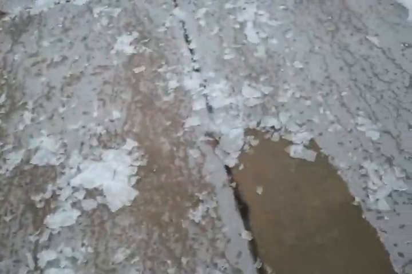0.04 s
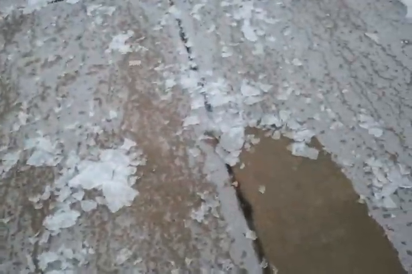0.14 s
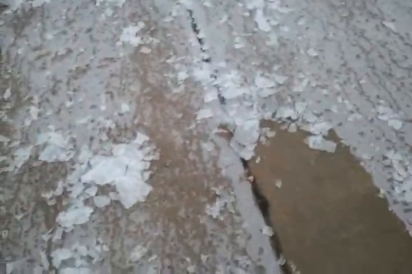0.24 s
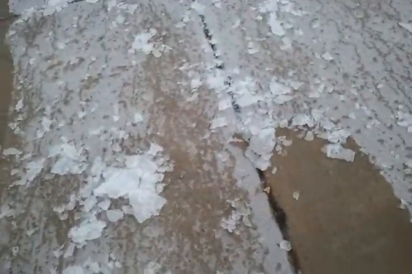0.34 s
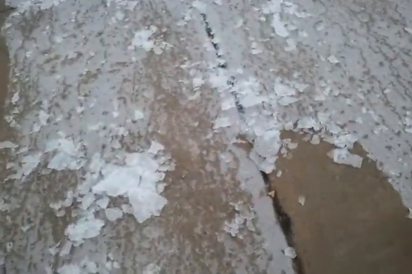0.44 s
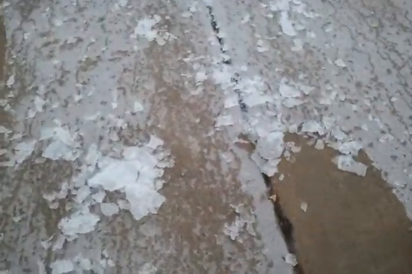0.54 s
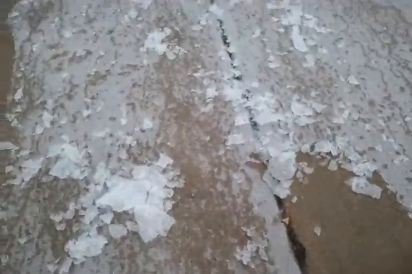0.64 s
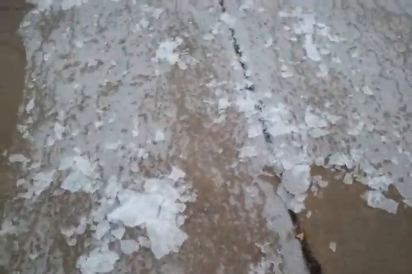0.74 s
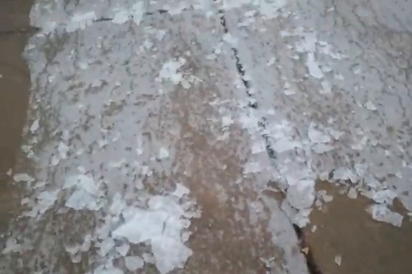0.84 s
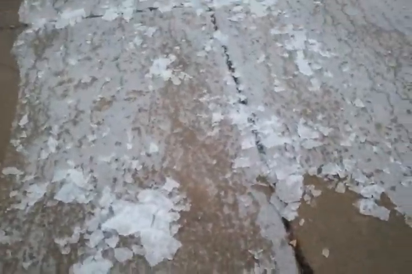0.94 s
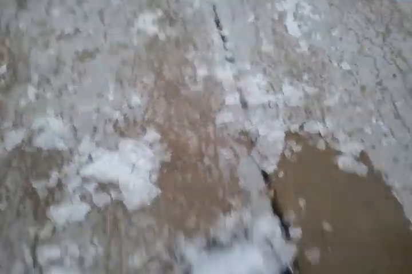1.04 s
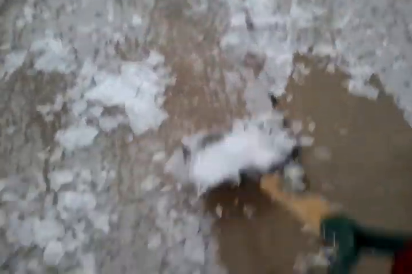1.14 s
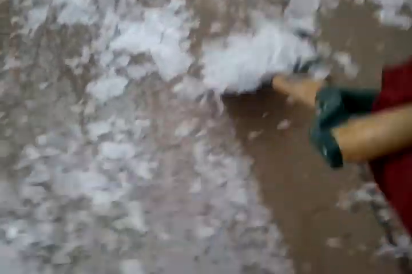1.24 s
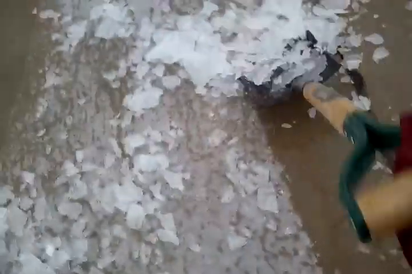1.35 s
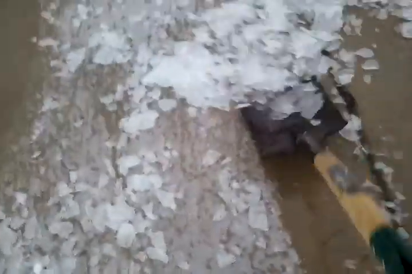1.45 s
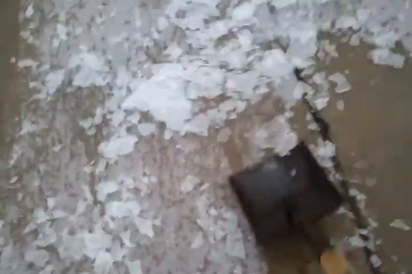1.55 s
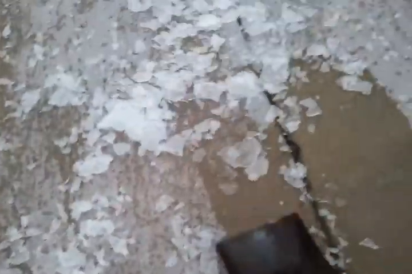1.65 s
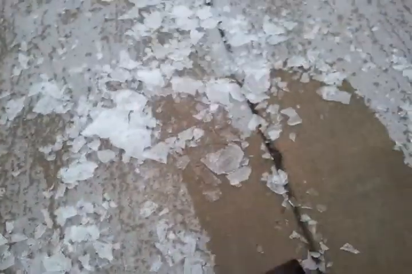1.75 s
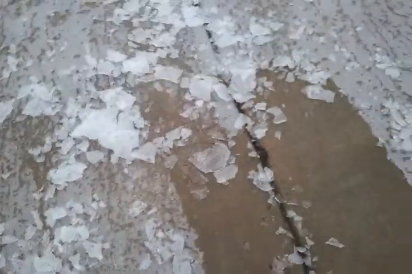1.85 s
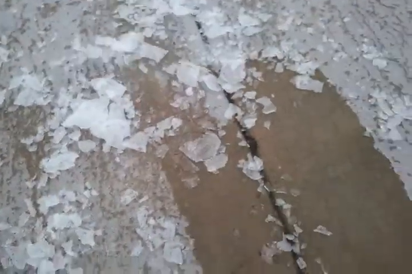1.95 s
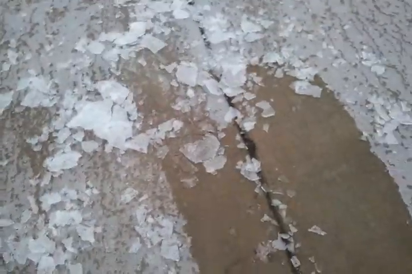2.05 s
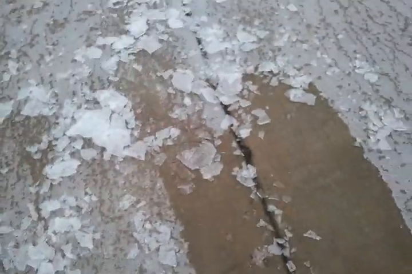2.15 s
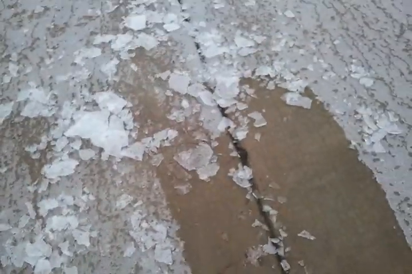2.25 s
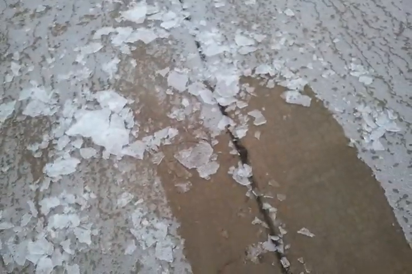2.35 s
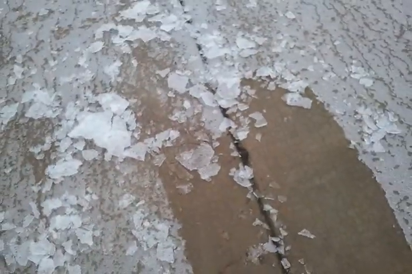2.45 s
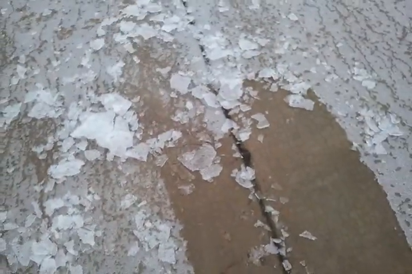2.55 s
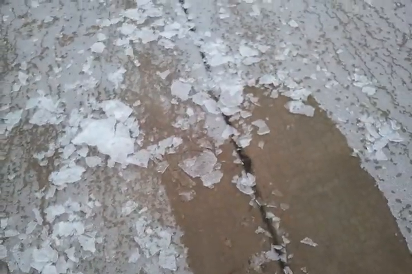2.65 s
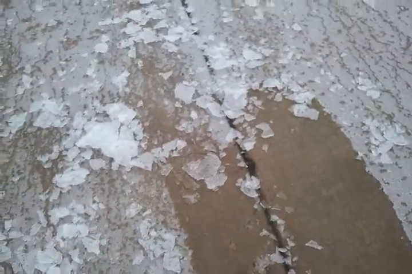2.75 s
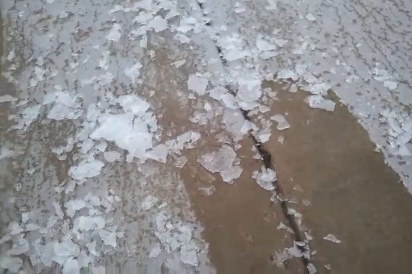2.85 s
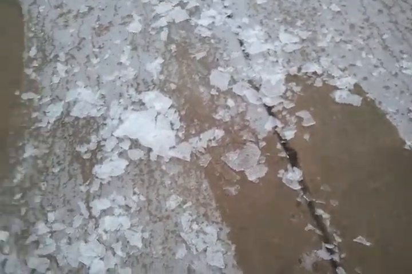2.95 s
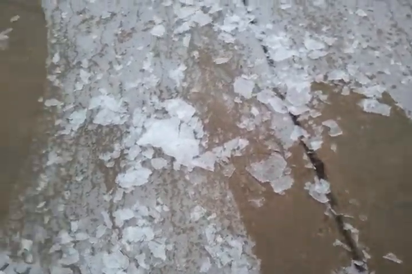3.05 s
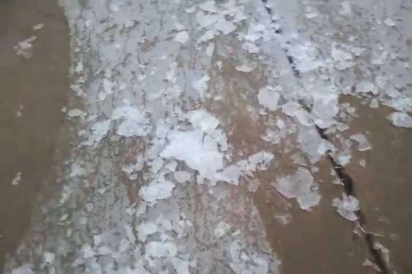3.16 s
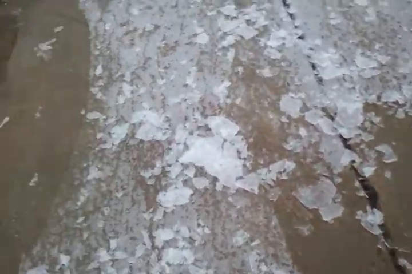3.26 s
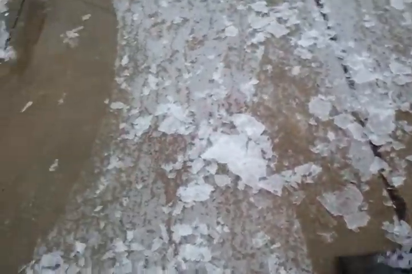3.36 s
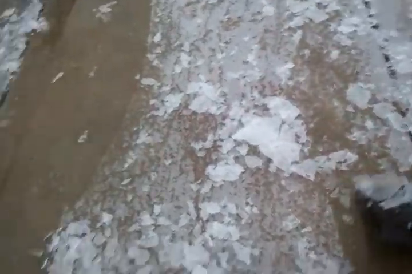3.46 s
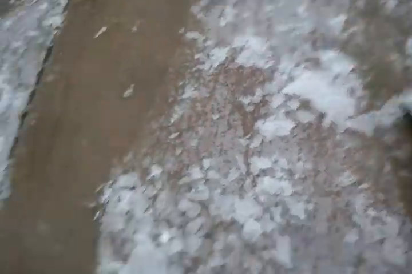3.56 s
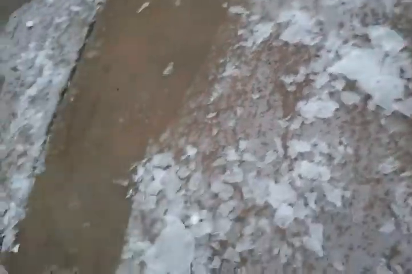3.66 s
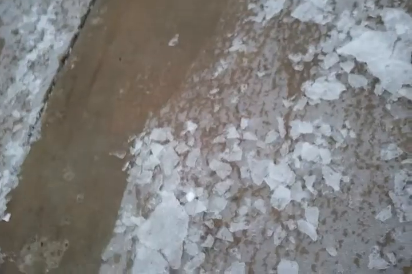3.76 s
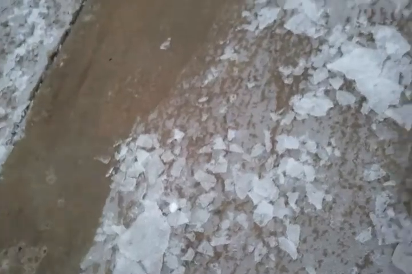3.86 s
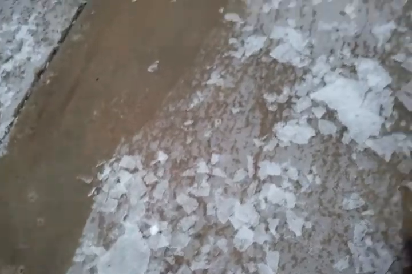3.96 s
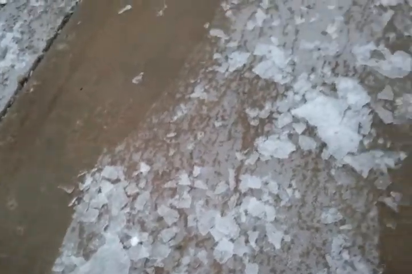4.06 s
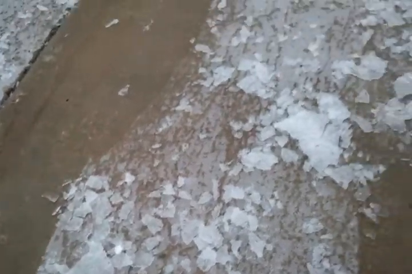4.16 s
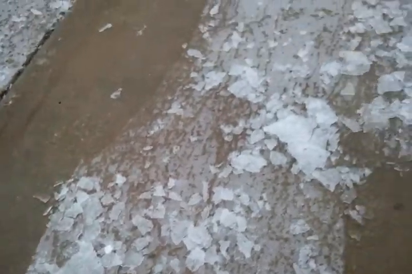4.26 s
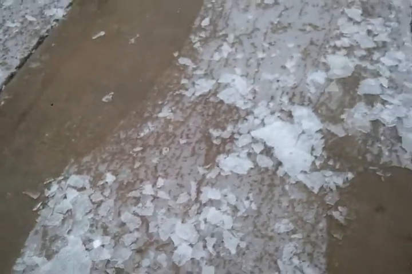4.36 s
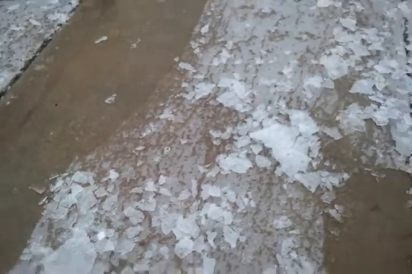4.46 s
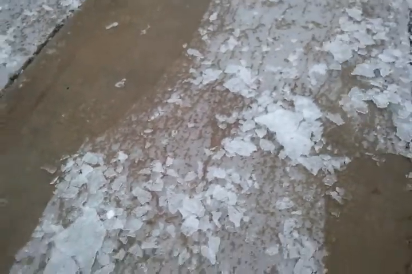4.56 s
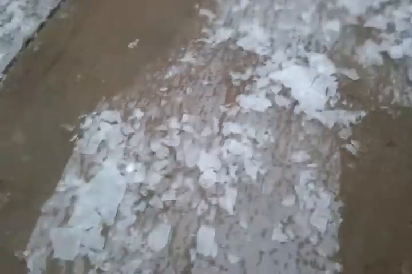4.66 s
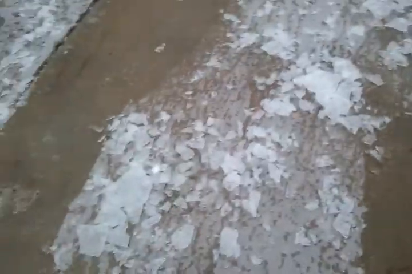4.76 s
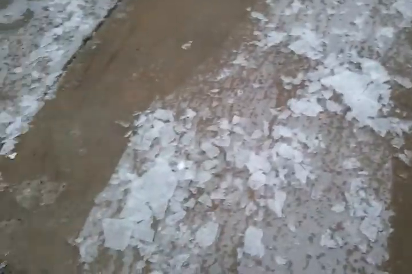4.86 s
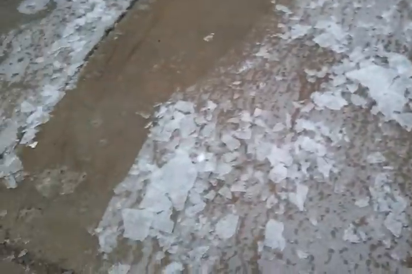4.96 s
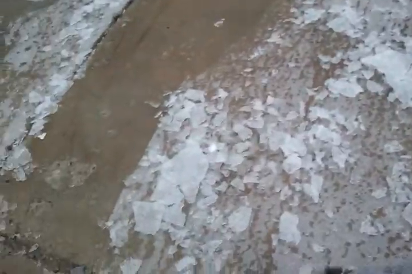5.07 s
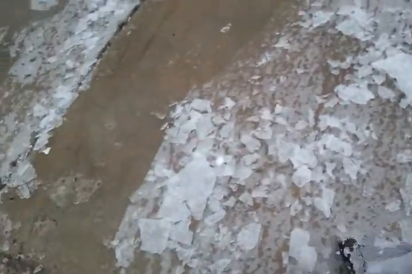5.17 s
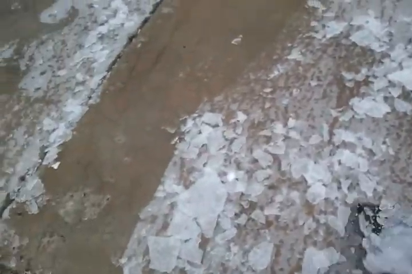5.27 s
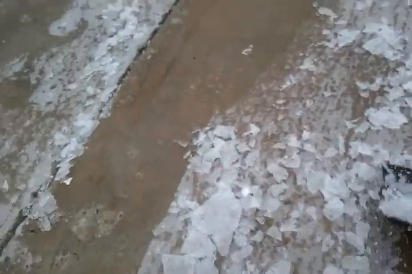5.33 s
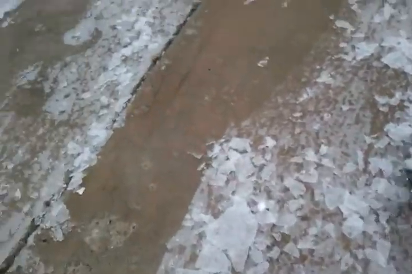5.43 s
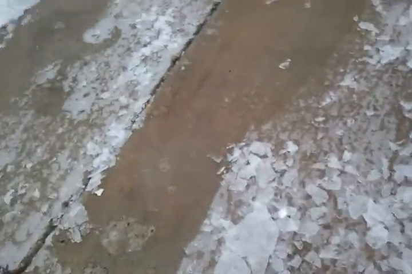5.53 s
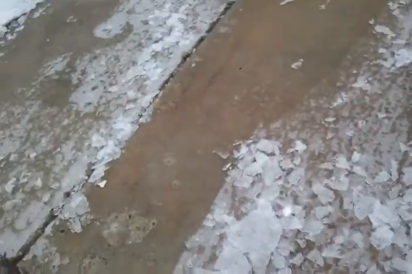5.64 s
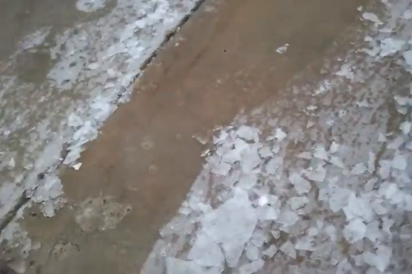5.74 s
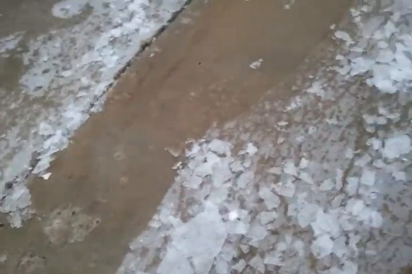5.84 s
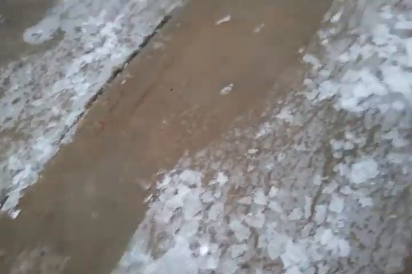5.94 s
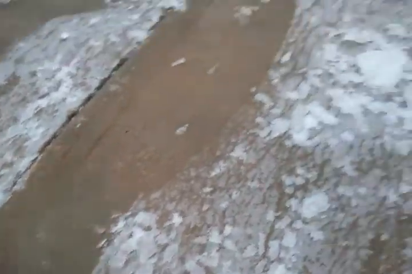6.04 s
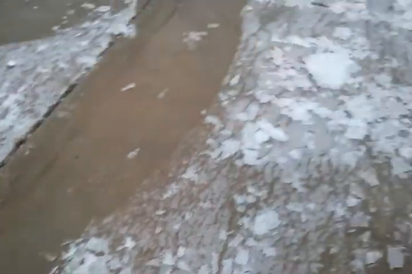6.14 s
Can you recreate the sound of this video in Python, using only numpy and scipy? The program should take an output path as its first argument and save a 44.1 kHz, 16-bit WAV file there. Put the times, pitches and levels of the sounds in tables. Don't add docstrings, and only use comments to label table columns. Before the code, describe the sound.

Close, gritty scraping and crunching of ice under a metal shovel outdoors, with ringing knocks, a bouncing blade drop and small clinking shards.

```python
import sys
import numpy as np
from scipy import signal
from scipy.fft import rfft, irfft, next_fast_len
from scipy.io import wavfile
from scipy.ndimage import uniform_filter1d

SR = 44100
rng = np.random.default_rng(int(sys.argv[2]) if len(sys.argv) > 2 else 0)


def materialize(psi):
    bounded = np.clip(np.atleast_2d(psi).T, -1, 1)
    quanta = np.round(bounded * 32767).astype(np.int16)
    wavfile.write(sys.argv[1], SR, quanta)


def decibels_to_gain(level_db):
    exponent = np.asarray(level_db, float) / 20
    return 10 ** exponent


N = 273420

# (time [s], level [dB], spot [0 face - 1 rim], tilt of the upper modes [dB per octave,
# higher is brighter], share of full ring time [0-1])
KNOCKS = [(.08, -19, .1, 1.5, 0.22), (.1, -10.5, 0.12, -4, 0.3), (.228, -13.5, .1, -1, 0.2),
          (.19, -15.5, .1, 0.5, 0.25), (.272, -8, 0.096, 4.5, 0.06), (.882, -6, 0.098, -2, 0.06),
          (1.70, -2.5, .1, -9, 0.96), (1.72, -11, 0.036, -19, 0.49), (1.845, -7, 0.1, -2.5, 0.63),
          (1.96, -9.5, .05, -14, 1), (1.99, -15, 0.097, -13, 0.45), (2.045, -9, 0.2, -7, 0.95),
          (2.095, -18, .1, 1.5, 1), (2.294, -20, 0.25, 4, 0.23), (3.886, -10, .1, -9, 0.27)]
# (time [s], level [dB], spot [0 face - 1 rim - 2 heel], tilt of the upper
# modes [dB per octave, higher is brighter], share of full ring time [0-1])
DROPS = [
    (4.317, -3, 0.01, -.8, .92),
    (4.493, -1.5, .99, 0, .85),
    (4.617, -20, 2, 0, .9),
    (4.664, -30, 2, 1, 1),
    (4.715, -25, 2, 0, .7),
    (4.775, -33, 2, 0, .55),
]


def at_hz(points, hz):
    known_hz, known_db = np.transpose(points)
    return np.interp(np.log(hz), np.log(known_hz), known_db)


def rms_one(x):
    return x / np.sqrt(np.mean(x ** 2) + 1e-20)


def drift(rate):
    r = np.exp(-40 * np.pi * rate / SR)
    draws = rng.standard_normal(N // 20 + 2002)
    slow = signal.lfilter([1], [1, -2 * r, r * r], draws)[2000:]
    return np.interp(np.arange(N) / 20, np.arange(len(slow)), rms_one(slow))


def ring(force, hz, t60):
    r, w = decibels_to_gain(-60 / (t60 * SR)), 2 * np.pi * hz / SR
    return signal.lfilter([0, np.sin(w)], [1, -2 * r * np.cos(w), r * r], force + 1e-18)


def narrow_noise(hz, width_hz):
    even_s = .07
    low_pass = signal.butter(1, width_hz / 2, fs=SR, output="sos")
    sway = signal.sosfilt(low_pass, rng.standard_normal((2, len(hz))))
    power = (sway ** 2).sum(axis=0)
    sway = sway / np.sqrt(uniform_filter1d(power, round(even_s * SR)) + .1 * power.mean())
    phase = 2 * np.pi * np.cumsum(hz) / SR
    return rms_one(sway[0] * np.cos(phase) + sway[1] * np.sin(phase))


def grains(per_s, spread_db):
    sizes = decibels_to_gain(spread_db * np.minimum(rng.exponential(1, N), 5)) * rng.choice([-1, 1], N)
    return rms_one(sizes * (rng.random(N) < per_s / SR))


def fragments(spectrum, per_s, spread_db, cycles, patchy_db, count):
    contacts, dealt = grains(per_s, spread_db), rng.integers(0, count, N)
    out, together = 0, drift(20.0)
    for k, hz in enumerate(np.geomspace(spectrum[0][0], spectrum[-1][0], count)):
        piece = rms_one(ring(contacts * (dealt == k), hz, cycles / hz))
        piece_db = at_hz(spectrum, hz) + patchy_db * (drift(11.0) + 0.91 * together)
        out = out + piece * np.sqrt(hz) * decibels_to_gain(piece_db)
    return rms_one(out)


def work():
    # (time [s], level [dB])
    litter_rows = [(0, -32), (.17, -30.5), (.74, -27), (.88, -26.5), (2.16, -34.5), (2.42, -24.5),
                   (2.68, -29), (2.97, -30), (3.85, -25), (3.95, -26), (4.02, -25.5), (4.18, -28),
                   (4.33, -29), (4.45, -32), (4.52, -31.5), (4.75, -34), (4.89, -34.5), (6.2, -24.5)]
    # (time [s], ice crushed [dB], edge pressed on concrete [dB], blade flex against edge [dB])
    jab = [(.28, -15.5, -18.5, 3.5), (.33, -9, -17.5, -3.5), (.41, -12, -17, -5.5), (.45, -16.5, -20.5, 2),
           (.52, -22, -23.5, -3.5), (.69, -21.5, -22.5, 0.5)]
    push = [(.88, -37, -33, -3), (.93, -9.5, -15, -14), (.98, -10, -14.5, 0), (1.07, -5.5, -12.5, -10),
            (1.14, -9, -15.5, -8.5), (1.24, -11.5, -14, -6.5), (1.41, -10, -18, -2.5),
            (1.445, -19, -22.5, -1.5), (1.55, -18.5, -24.5, -12)]
    pull = [(1.6, -12.5, -31, -4), (1.66, -14, -21.5, -7), (1.71, -13, -28, 2), (1.81, -18.5, -24.5, -22),
            (1.85, -11.5, -24.5, 4), (1.93, -18, -21, -31), (2.02, -21, -38, 12.5), (2.16, -29.5, -34, 1),
            (2.28, -25.5, -37.5, 5)]
    slow_push = [(3.051, -24.5, -35.5, 6), (3.23, -17, -39, -5), (3.33, -13, -25.5, 0),
                 (3.45, -11, -23.5, 4), (3.56, -6.5, -23, 5.5), (3.66, -8.5, -18, 2), (3.71, -8, -17.5, -6),
                 (3.761, -11.5, -15, -6.5), (3.85, -22.5, -31.5, -3)]
    hard_push = [(4.969, -14.5, -26, 9.5), (5.09, -12.5, -33.5, 7.5), (5.135, -12.5, -19.5, 0.5),
                 (5.2, -12.5, -19.5, -7), (5.32, -10, -19, 2.5), (5.44, -8, -15.5, -5.5),
                 (5.58, -7.5, -14, 2.5), (5.7, -8.5, -22.5, 6.5), (5.745, -11, -17.5, -12)]
    spill = [
        (5.82, -16.5, -32, -2),
        (5.97, -16, -21, -31),
        (6.1, -18.5, -22.5, -30),
    ]
    restart = [
        (6.115, -17, -26.5, 2.5),
        (6.2, -9, -19, -0.93),
    ]
    # (cracking against crushing [dB], hum pitch [Hz])
    grips = [
        (-3.5, 720),
        (-4, 715),
        (-5, 712),
        (-8.5, 695),
        (-5.5, 735),
        (-7, 740),
        (-10, 718),
    ]
    bite_db_per_s, lift_db_per_s = 304, 203
    knock_hum_db, knock_hum_t60_s = -15.5, 0.19

    t = np.arange(N) / SR
    against_powder_db = np.array([[0], [-1.5], [-6.5], [-19]])
    power = decibels_to_gain(np.interp(t, *np.transpose(litter_rows)) + against_powder_db) ** 2
    strokes = jab, push, pull, slow_push, hard_push, spill, restart
    for stroke, (crack_db, _) in zip(strokes, grips):
        s, ice_db, edge_db, flex_db = np.transpose(stroke)
        away = bite_db_per_s * np.maximum(s[0] - t, 0) + lift_db_per_s * np.maximum(t - s[-1], 0)
        ice = np.interp(t, s, ice_db) - away
        edge = np.interp(t, s, edge_db) - away
        flex = edge - away + np.interp(t, s, flex_db)
        power += decibels_to_gain(np.array([ice, ice + crack_db, edge, flex])) ** 2
    for s, db, *_ in KNOCKS + DROPS:
        power[3] += (t > s) * decibels_to_gain(db + knock_hum_db - 60 * abs(t - s) / knock_hum_t60_s) ** 2
    middles = [(stroke[0][0] + stroke[-1][0]) / 2 for stroke in strokes]
    return np.sqrt(power), np.interp(t, middles, np.transpose(grips)[1])


def brief_dips():
    # (middle [s], half length [s], depth [dB])
    dip_rows = [(0.296, 0.0066, -9.5), (0.5, 0.0094, -6.5), (0.714, 0.0083, -4), (0.568, 0.01, 1),
                (1.83, 0.0093, -3), (1.891, 0.022, -8), (3.29, 0.0081, -6.5), (5.066, 0.0063, 1.5),
                (5.109, 0.026, -5), (5.2, 0.0087, -3.5), (5.229, 0.0055, -4), (5.268, .008, -2.5),
                (5.737, 0.016, -6.5), (0.108, .005, -7), (0.18, 0.0054, 0), (0.846, .007, -4),
                (2.451, 0.0055, -0.5), (2.586, 0.036, -0.5), (2.86, 0.028, -1), (3.142, 0.0048, -5),
                (4.41, 0.054, -1), (4.648, 0.011, -3), (4.923, 0.018, -4.5)]
    t = np.arange(N) / SR
    return decibels_to_gain(sum(db * np.exp(-((t - s) / half) ** 4) for s, half, db in dip_rows))


def slaps():
    # (time [s], level [dB], t60 [s])
    snap_rows = [(.1016, -10, 0.053), (.2483, -6, 0.25), (.2737, 12, 0.049), (.3066, 0, .08),
                 (.3303, -7, .084), (.4594, -1.5, 0.25), (.5452, -13, .07), (.58, -1.5, 0.28),
                 (.611, 2.5, 0.23), (.6394, 2, 0.2), (.664, 14, 0.056), (.8829, 4.5, 0.036),
                 (.909, -6, 0.11), (3.051, -4, 0.14), (3.1038, -3, 0.11), (3.117, 0, 0.15),
                 (3.1467, -0.5, 0.059), (3.1644, -4, 0.031), (3.2225, 1, 0.064), (3.2574, -6, 0.081),
                 (3.3472, 0, 0.37), (3.7694, 1, 0.052), (4.9539, 5, 0.33), (5.0, 3, 0.13),
                 (5.0494, -4, .091), (5.1277, 6.5, 0.065), (5.17, 3, 0.11), (5.237, 4.5, 0.1),
                 (5.2811, 6, 0.12), (6.1194, 0.5, .072), (.004, -15, 0.092), (.149, -12, .05),
                 (.507, -5, 0.055), (.705, -9, 0.25), (.726, -13, 0.061), (1.684, 9, 0.055),
                 (2.223, -8, 0.046), (3.205, -1.5, 0.053), (3.297, -3, 0.091), (4.011, -4, .07),
                 (5.22, 0, .04), (5.762, -5, 0.066), (5.826, -6, 0.1), (5.975, -5, 0.074), (6.1, 0, .12),
                 (6.145, 3, 0.071)]
    # (time [s], level [dB], t60 [s])
    shake_rows = [(1.559, 1, 0.086), (1.6033, 7, 0.073), (1.6994, 7, 0.071), (1.8094, 0, .11),
                  (1.8462, 12.5, 0.062), (1.9349, 5.5, 0.13), (2.0238, -1, 0.64), (2.0432, 6, 0.1),
                  (2.09, 1.5, 0.089), (2.141, 5.5, 0.067), (2.1883, 3, 0.085), (2.2942, -1.5, 0.078),
                  (3.984, -2, 0.066), (4.0242, -3, 0.12), (4.0444, -10, 0.043), (4.295, 16, 0.1),
                  (5.7494, -12, 0.15)]
    # (time [s], level [dB], t60 [s])
    scatter_rows = [(4.4838, 11, 0.09), (4.6029, 3.5, 0.08), (4.6144, 1.5, 0.094), (4.6633, -11.5, 0.23),
                    (4.711, 2, 0.08), (4.7735, -12, .06)]
    power = np.zeros(N)
    for rows, rise_s in (snap_rows, 0.0029), (shake_rows, 0.007), (scatter_rows, 0.0044):
        for s, db, t60 in rows:
            start = round(s * SR)
            t = np.arange(min(SR // 2, N - start)) / SR
            swell = 1 - np.exp(-t / rise_s)
            power[start:][:len(t)] += (swell * decibels_to_gain(db - 11.0 - 60 * t / t60)) ** 2
    return power


def ice_powder(lively):
    # (frequency [Hz], density [dB per Hz])
    ice_spectrum = [(3500, -9.5), (4500, -11.5), (5500, -5), (6900, 3), (8000, -0.5), (10000, -20)]
    return fragments(ice_spectrum, 14000, 1.7, 17.0, patchy_db=1.59 * lively, count=14)


def cracking_crust(lively):
    # (frequency [Hz], density [dB per Hz])
    crust_spectrum = [(1800, -24), (2600, -2.5), (3400, -2), (4200, -2.5), (5500, -3.5)]
    return fragments(crust_spectrum, 8000, 1.75, 12.5, patchy_db=1.97 * lively, count=12)


def grinding_edge(lively):
    # (frequency [Hz], density [dB per Hz])
    grind_spectrum = [(60, -34), (200, 3), (400, -0.5), (900, -13.5), (1300, 6), (2200, 3.5), (3200, 0.5)]
    return fragments(grind_spectrum, 8000, 2.6, 11.7, patchy_db=1.3 * lively, count=22)


def loaded_blade(hum, hum_hz):
    # (start [s], length [s],
    # frequency [Hz], width [Hz], level [dB])
    squeal_rows = [(0, 0.058, 1540, 80, -37), (.07, .07, 1560, 71, -39), (.73, 0.092, 1510, 220, -32),
                   (1.95, .13, 1548, 5, -25.5), (1.72, .11, 758, 12, -28), (1.828, .04, 765, 60, -20),
                   (2.09, .05, 758, 40, -28), (1.87, .08, 686, 10, -28), (.3, 0.14, 2870, 150, -25.5),
                   (3.041, .3, 627, 28, -30), (3.13, 0.11, 1564, 100, -31), (3.653, 0.11, 1350, 130, -27.5),
                   (3.05, .29, 2910, 200, -31), (3.1, .23, 3200, 190, -28), (3.11, .07, 3750, 120, -27),
                   (3.35, .17, 3450, 100, -22), (3.4, .12, 3830, 160, -24), (3.43, .045, 930, 80, -23),
                   (3.57, .18, 2500, 500, -20), (1.985, .065, 757, 12, -21), (1.965, .12, 687, 6, -24),
                   (2.56, .48, 770, 130, -42), (0, .035, 720, 100, -32), (3.74, .05, 700, 120, -19),
                   (.06, .1, 2890, 250, -36), (.04, .05, 740, 120, -40), (3.22, .08, 1650, 120, -30),
                   (3.858, .06, 720, 110, -28), (4.293, .03, 720, 150, -27), (4.78, .13, 711, 120, -42),
                   (1.86, .11, 762, 12, -27), (1.07, .07, 3440, 95, -19), (.94, .07, 2490, 95, -21),
                   (1.19, .2, 2140, 170, -21), (1.24, .12, 2450, 130, -22), (1.27, .13, 1280, 120, -22),
                   (2.75, .25, 1400, 400, -41),
                   (4.95, .08, 2940, 90, -16), (4.975, .06, 1500, 150, -20), (5.01, .025, 820, 60, -20),
                   (5.035, .07, 800, 70, -22), (5.565, .035, 680, 30, -16), (5.255, .022, 2110, 62, -22),
                   (5.27, .02, 3550, 150, -17), (5.279, .12, 1335, 180, -21), (5.476, .13, 1290, 90, -19),
                   (5.585, .04, 2165, 40, -15), (5.59, .12, 1390, 90, -20), (5.62, .105, 2185, 45, -17)]
    lower = narrow_noise(hum_hz - 30, width_hz=77)
    upper = decibels_to_gain(-1.5) * narrow_noise(hum_hz + 36, width_hz=133)
    out = hum * rms_one(lower + upper)
    t = np.arange(SR // 2) / SR
    for s, length, hz, width_hz, db in squeal_rows:
        start = round(s * SR)
        swell = np.abs(np.sin(np.pi * np.clip(t / length, 0, 1))) ** 0.41
        squeal = decibels_to_gain(db) * swell * narrow_noise(np.full(len(t), hz), width_hz)
        out[start:][:len(t)] += squeal[:N - start]
    return out


def free_blade():
    # (frequency [Hz], t60 [s], struck on the face [dB], on the rim [dB], on the heel [dB])
    mode_rows = [(522, .4, -23, -36, -16), (693, .58, -10, -20, 0), (768, .25, -14, -26, 0),
                 (824, .07, -40, -15, -12), (944, .25, -40, -22, -10), (1043, .2, -40, -16, -14),
                 (1120, .15, -40, -19, -14), (1360, .3, -30, -28, -5), (1546, .75, -19, -23, -24),
                 (1612, .3, -15, -33, -14), (1630, .13, -40, -40, 0), (1948, .45, -22, -33, -18),
                 (1992, .32, -26, -30, -16), (2168, .45, -23, -33, -22), (2343, .2, -18, -29, -14),
                 (2730, .5, -16, -20, -16), (2890, .15, -16, -11, -4), (3050, .1, -11, -34, -12),
                 (3280, .11, -15, -10, 2), (3481, .1, -12, -33, -5), (3793, .24, -20, -14, -1),
                 (3861, .15, -10, -5, -1), (4585, .2, -16, -21, -14), (4647, .2, -16, -31, -16),
                 (4720, .15, -27, -27, -10), (5280, .15, -27, -19, -9), (5774, .11, -12, -32, -20),
                 (7169, .15, -30, -18, -12)]
    free_share = .53
    landing_t60_s, rise_s = .03, 0.00034
    laden_from_s, laden_to_s, laden_sag = 1.6, 2.2, .01

    hz, t60, *spots_db = np.transpose(mode_rows)
    out, t = np.zeros(N), np.arange(SR // 2)[:, None] / SR
    empty = np.sin(2 * np.pi * hz * t)
    laden = np.sin(2 * np.pi * hz * (1 - laden_sag * (hz < 800)) * t)
    for s, db, spot, tilt_db, share in KNOCKS + DROPS:
        nearness = np.clip(1 - abs(spot - np.arange(3)), 0, 1)
        start_db = db + nearness @ spots_db + tilt_db * np.log2(hz / hz[1])
        later = [row[0] - s for row in DROPS + KNOCKS if row[0] > s and row[4] > free_share]
        landing = min(later, default=1)
        sines = laden if laden_from_s < s < laden_to_s else empty
        modes = (sines * decibels_to_gain(start_db - 60 * t / (t60 * share))).sum(axis=1)
        stifled = decibels_to_gain(-60 * np.maximum(t[:, 0] - landing, 0) / landing_t60_s)
        out[round(s * SR):][:len(t)] += modes * stifled * (1 - np.exp(-t[:, 0] / rise_s))
    return out


def ticks():
    # (time [s], level [dB], pitch [Hz])
    tick_rows = [(3.886, -9, 700), (.735, -8, 6500), (.9015, -4, 7500), (1.525, -5, 4000),
                 (5.898, -7, 5500), (6.028, -3, 5000), (.078, -16, 3000), (.101, -13, 4500),
                 (.1715, -13, 5000), (.547, -5, 5500), (.579, -3, 6000), (.6945, -4, 5500),
                 (.908, -4, 5000), (1.677, -5, 1800), (1.764, -4, 5000), (2.296, -10, 3800),
                 (2.731, -14, 5000), (3.0367, -14, 5900), (3.232, -5, 3500), (3.3, -7, 5000),
                 (4.0255, -7, 2500), (4.186, -7, 5820), (4.198, -14, 5000), (4.822, -18, 3500),
                 (0.1171, -6, 4500), (0.191, -14, 6450), (0.5071, -2, 5500), (0.783, -4, 4500),
                 (0.8429, -3, 4800), (2.2653, -7, 6650), (2.4089, -6, 7110), (2.4573, -4, 4200),
                 (2.5117, -8, 7040), (2.583, -15, 5010), (2.829, -16, 7070), (3.0101, -13, 5840),
                 (3.7994, -4, 6770), (3.9159, -3, 6890), (3.9594, -12, 6770), (3.9838, -6, 5800),
                 (4.0094, -8, 6810), (4.0507, -3, 6890), (4.0866, -4, 6860), (4.1444, -13, 3570),
                 (4.2183, -7, 5740), (4.8584, -17, 5790), (4.9232, -19, 3850)]
    rise_s, t60_s = .0011, .018
    out, snaps = np.zeros(N), rng.standard_normal((len(tick_rows), 800))
    t = np.arange(800) / SR
    for (s, db, hz), snap in zip(tick_rows, snaps):
        burst = snap * (1 - np.exp(-(t / rise_s) ** 2)) * decibels_to_gain(-60 * t / t60_s)
        rung = ring(np.diff(burst, prepend=0), hz, 2.0 / hz)
        out[round(s * SR):][:800] += decibels_to_gain(db - 9.5) * rung / rung[22:132].std()
    return out


def thump():
    # (time [s], level [dB], frequency [Hz], t60 [s])
    bump = (3.886, -5, 500, .014)
    s, db, hz, t60 = bump
    out = np.zeros(N)
    out[round(s * SR):][:2000] = decibels_to_gain(db) * ring(signal.unit_impulse(2000), hz, t60)
    return out


def outdoor_air():
    return decibels_to_gain(-41.5) * rms_one(signal.lfilter([1], [1, -.93], rng.standard_normal(N)))


def scene():
    heaps = slaps()
    (powder, cracking, grinding, hum), hum_hz = work()
    lively = np.clip(powder / decibels_to_gain(-24), .4, 1)
    bite = np.hypot(powder, np.sqrt(heaps)) * ice_powder(lively)
    bite = bite + np.hypot(cracking, np.sqrt(0.29 * heaps)) * cracking_crust(lively)
    grind = np.hypot(grinding, np.sqrt(0.11 * heaps)) * grinding_edge(lively)
    hum = hum * decibels_to_gain(1.5 * drift(13.0))
    hum_hz = hum_hz + 15 * drift(6.037)
    scrape = brief_dips() * (bite + grind) + loaded_blade(hum, hum_hz)
    return (scrape + free_blade() + ticks() + thump() + outdoor_air())[None]


def cut_top(x, from_hz, to_hz, steep):
    size = next_fast_len(N + 2048)
    fade = np.clip((np.fft.rfftfreq(size, 1 / SR) - from_hz) / (to_hz - from_hz), 0, 1)
    gain = (.5 + .5 * np.cos(np.pi * fade)) ** steep
    return irfft(rfft(x, size) * gain, size)[:, :N]


def top_cut(x):
    return signal.sosfilt(signal.butter(12, 16850, fs=SR, output="sos"), x)


def record(dry):
    input_top, output_top = 0.73, 0.7
    thin = signal.sosfiltfilt(signal.butter(2, 551, "high", fs=SR, output="sos"), dry)
    clipped = np.clip(0.83 * thin + 0.31 * dry, -input_top, input_top)
    narrow = cut_top(clipped, 7400, 9420, steep=1.56)
    mix = np.clip(narrow, -output_top, output_top)
    return top_cut(mix)


dry = scene()
out = record(dry)
materialize(out)
```